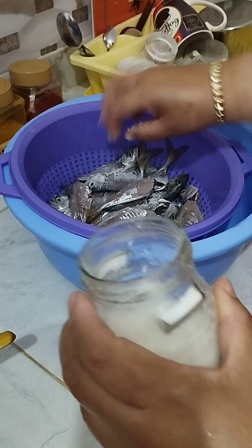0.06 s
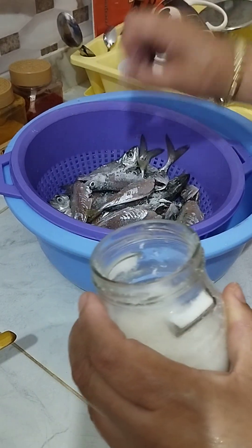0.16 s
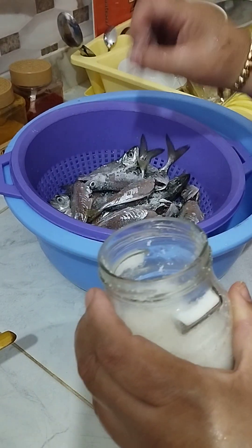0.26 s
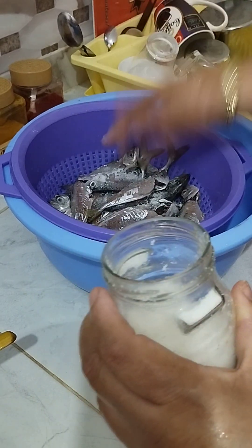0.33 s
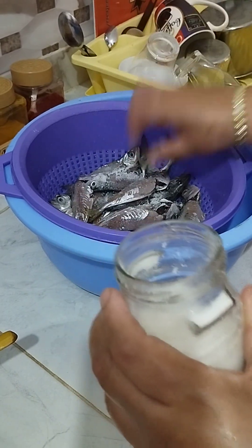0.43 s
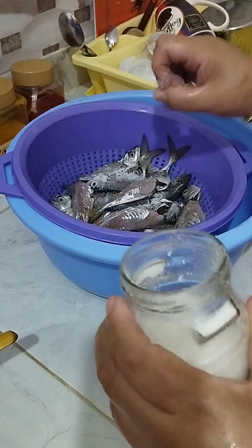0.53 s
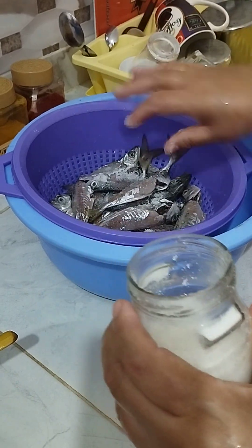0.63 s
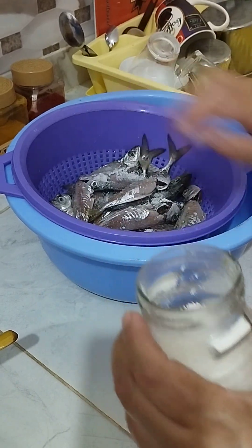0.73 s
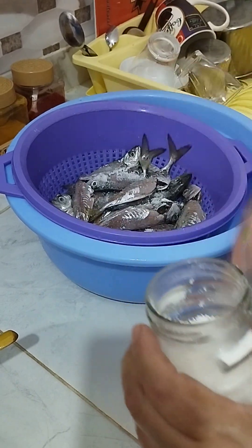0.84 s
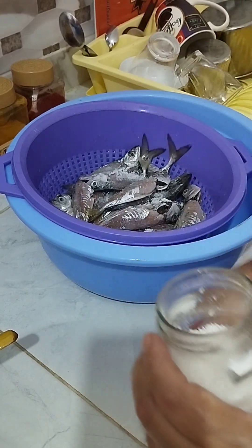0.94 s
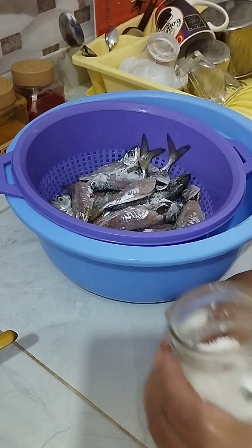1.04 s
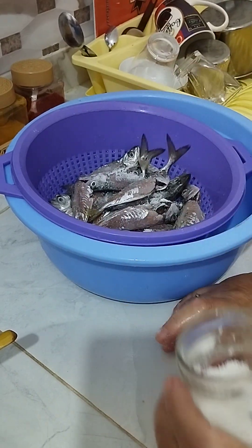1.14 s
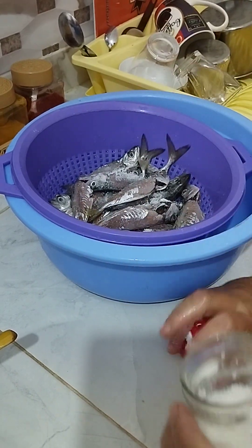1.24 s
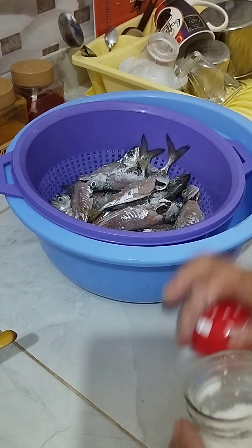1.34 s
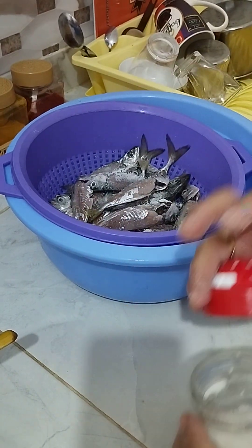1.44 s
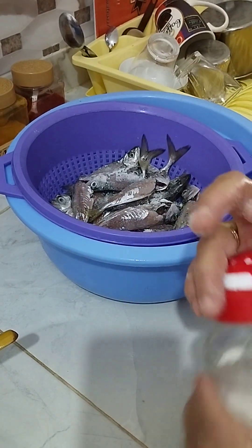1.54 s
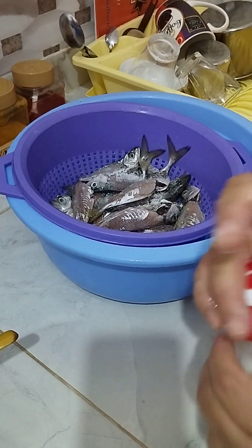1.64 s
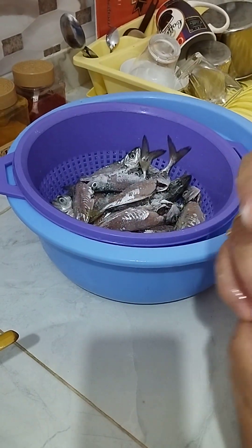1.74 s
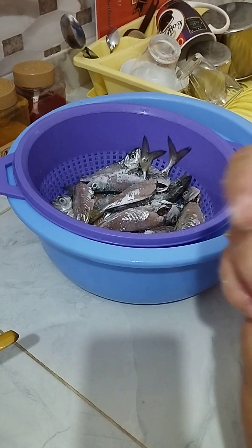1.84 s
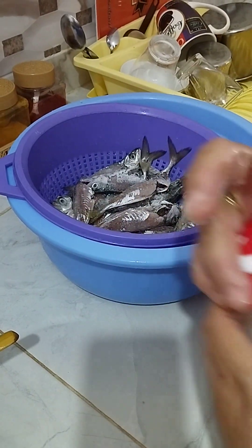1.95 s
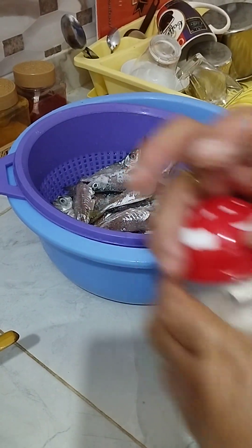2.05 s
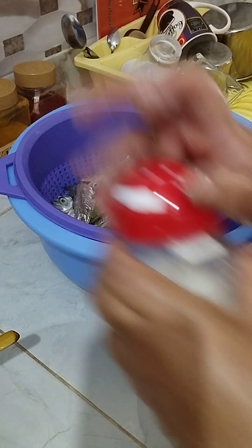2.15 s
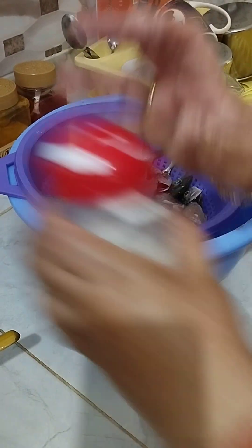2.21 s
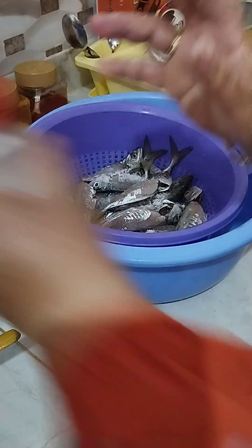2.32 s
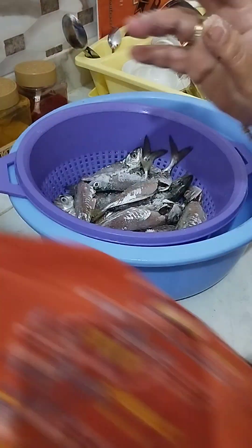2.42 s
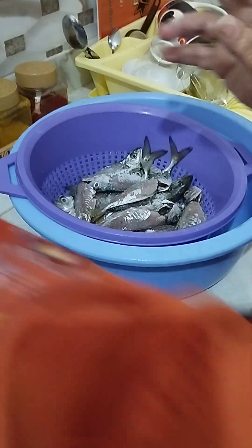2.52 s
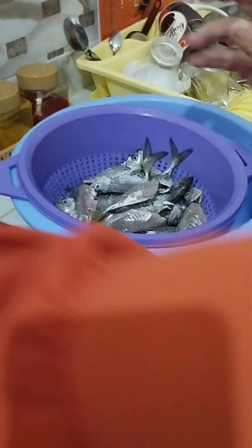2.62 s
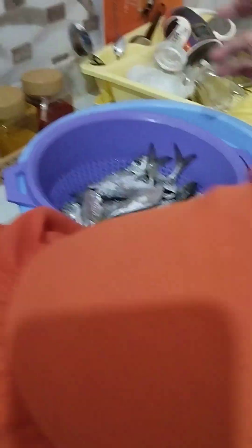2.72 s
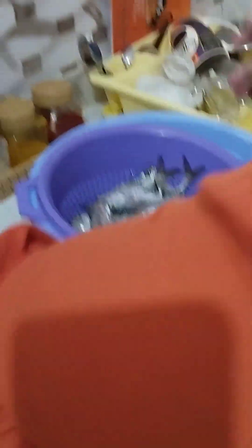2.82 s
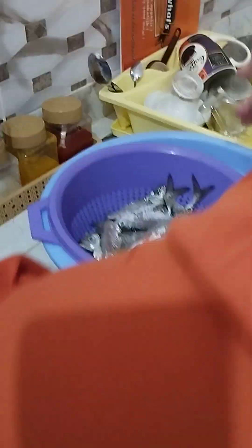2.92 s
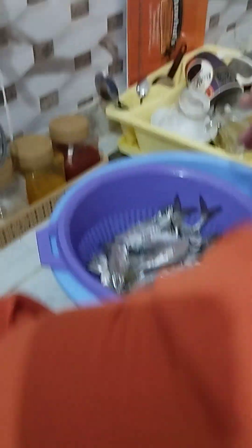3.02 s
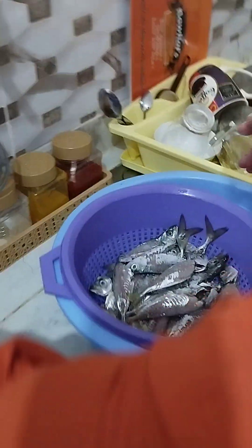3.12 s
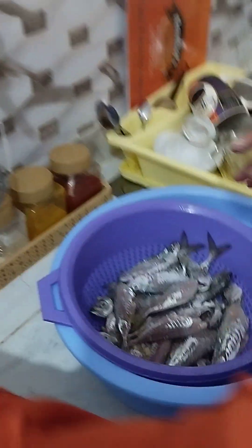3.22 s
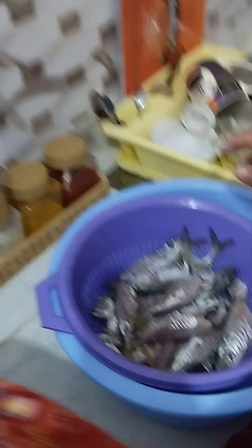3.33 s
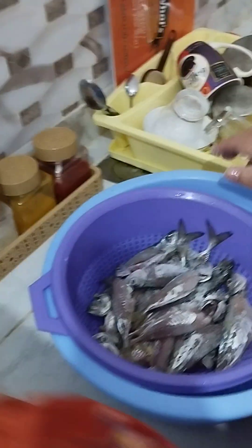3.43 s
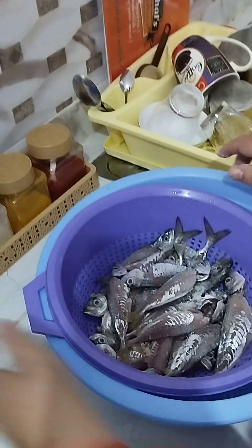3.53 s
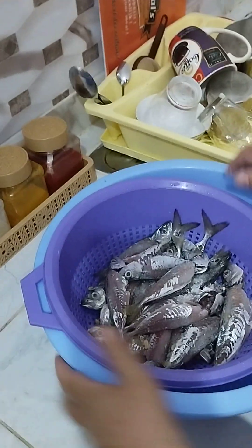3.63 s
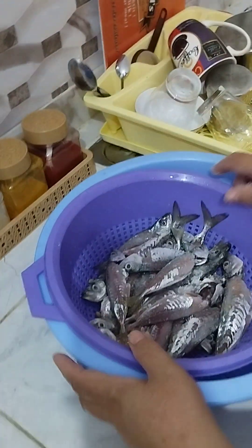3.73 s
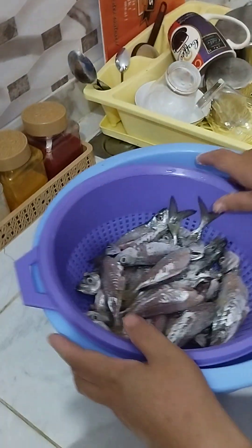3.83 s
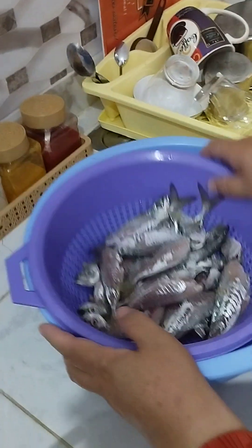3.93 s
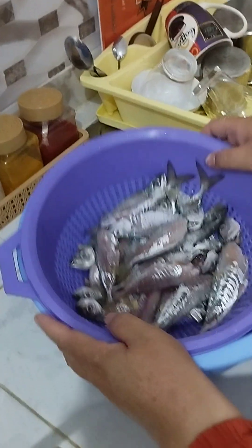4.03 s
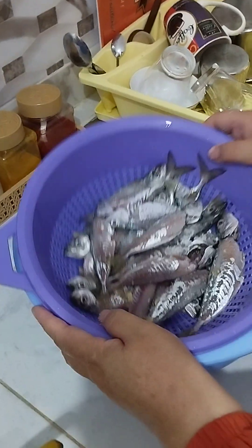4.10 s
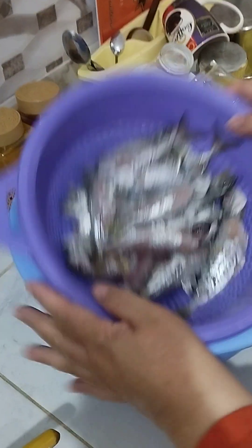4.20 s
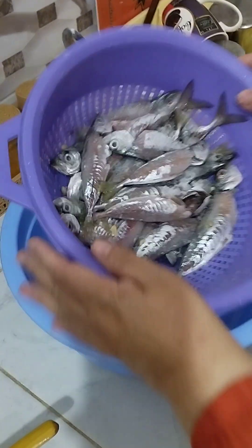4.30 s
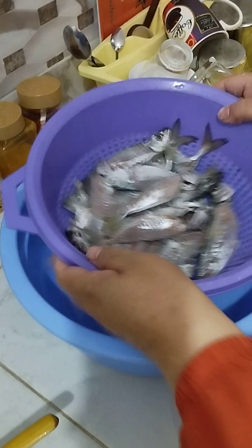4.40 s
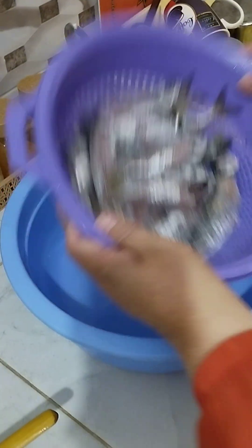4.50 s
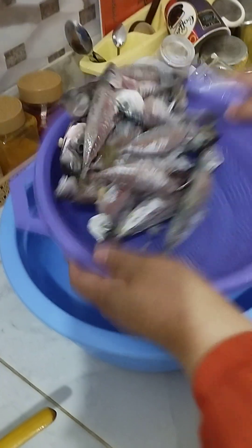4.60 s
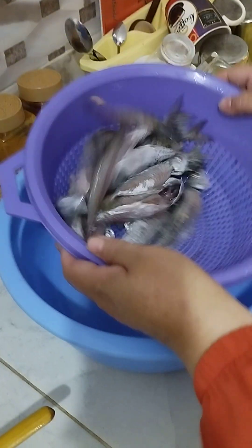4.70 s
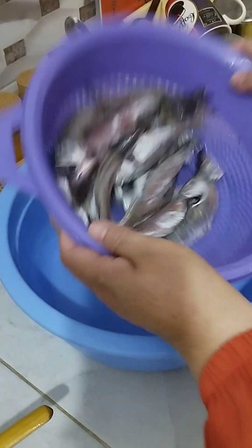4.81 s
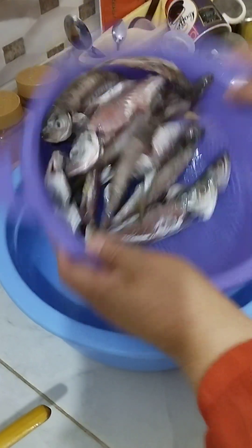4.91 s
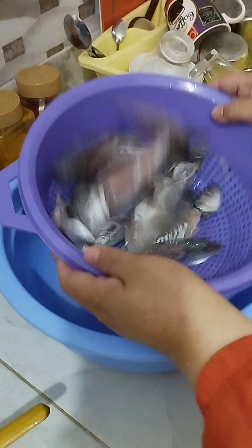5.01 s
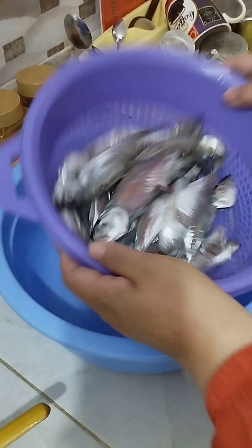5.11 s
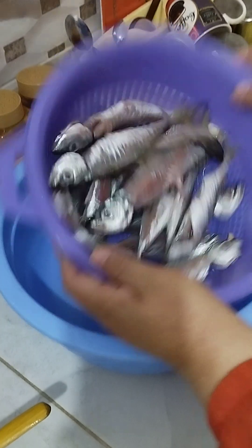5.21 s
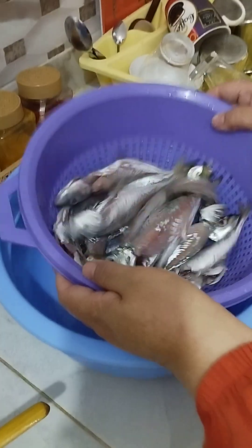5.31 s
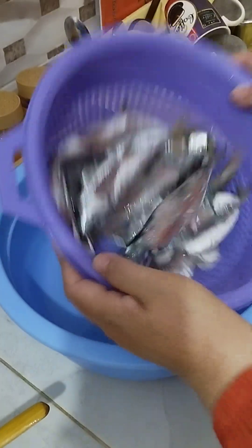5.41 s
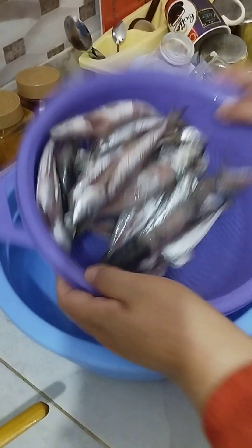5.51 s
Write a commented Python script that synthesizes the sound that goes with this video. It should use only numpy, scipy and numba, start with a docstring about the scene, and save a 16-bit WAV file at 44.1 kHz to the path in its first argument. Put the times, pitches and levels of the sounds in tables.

```python
"""A tiled kitchen where a motor hums under it all, heard through a phone's two microphone ports.
A hand salts fish: grains rustle and sizzle, with dull thuds and ticks. A plastic lid rattles round its
thread and snaps onto a jar, its modes swelling and dying. A basin is pushed about, then a plastic colander
of fish is tossed about three times a second: pushes ring basin modes, slides rustle, noise cracks."""
import sys
import numpy as np
from scipy import signal
from scipy.fft import rfft, irfft
from scipy.io import wavfile
from scipy.ndimage import uniform_filter1d
from numba import njit

SR = 44100
rng = np.random.default_rng(int(sys.argv[2]) if len(sys.argv) > 2 else 0)


def store_wav(level_fs):
    """Save 16-bit WAV to argv[1]."""
    pcm = np.round(np.clip(np.atleast_2d(level_fs), -1, 1) * 32767)
    wavfile.write(sys.argv[1], SR, pcm.T.astype(np.int16))


N = 244907

# Steady air of the kitchen, relative spectrum: (frequency [Hz], level [dB])
AIR_SPECTRUM = [(30, -39), (75, -6.5), (110, -7), (200, -13.5), (320, -14.5), (600, -22.5), (1300, -33.5),
                (2500, -33), (5000, -43), (9000, -30.5), (16000, -37)]
AIR_DB = -49.5  # central rms level
# Motor, hum then whine: (frequency [Hz], hum wander or whine bandwidth [Hz], central rms level [dB])
MOTOR = [(146.2, 2.12, -46.5), (985, 28, -64)]
# Phone in an unsteady hand: (time [s], rms level [dB])
HANDLING_LEVEL = [(0.0, -42.5), (2.6, -42.5), (3.0, -43.5), (3.6, -35), (4.1, -36), (5.55, -43)]
# Relative spectrum of that handling: (frequency [Hz], gain [dB])
HANDLING_SPECTRUM = [(15, 4.5), (30, -4.5), (50, -6.0), (75, -17), (120, -40.5)]
# Decay of the tiled room, never used below 0.1 s: (frequency [Hz], time to fall 60 dB [s])
ROOM_T60 = [(60, 0.67), (250, 0.9), (1000, 0.7), (4000, 0.73), (8000, 0.32), (16000, 0.05)]
# Echo of the tiled walls: (frequency [Hz], echo energy over its send [dB])
ROOM_LEVEL = [(60, 1), (140, -1), (280, -4.5), (600, -0.5), (1200, -2.5), (2500, -2.5), (4000, -7),
              (8000, -3), (16000, -12)]
# Likeness of the two channels of a noise: (frequency [Hz], left-right correlation [-1 to 1])
STEREO_LIKENESS = [(25, 0.06), (80, 1), (160, 1), (350, 0.54), (700, 0.24), (1400, 0.011), (16000, 0.016)]
# Response shared by both microphone ports: (frequency [Hz], gain [dB])
MIC_RESPONSE = [(20, -5), (4500, 1.5), (7000, -3), (8000, -13.5), (10000, -12), (11000, -17), (12000, -4),
                (14000, -4), (16000, -13)]
# Mismatch of the two ports: (frequency [Hz], left minus right [dB])
PORT_MISMATCH = [(60, 2.5), (110, 0.5), (200, -2.5), (380, 1), (700, 0.5), (1290, 0), (2380, -1),
                 (4400, -2.5), (8120, -8), (15000, 8.5)]
TOP_HZ = 16000  # cutoff after the ports

# Lid turning on the jar: (time [s], rms level [dB])
THREAD_LEVEL = [(1.951, -85), (1.959, -35.5), (2.0, -54), (2.07, -48.5), (2.095, -46), (2.17, -47.5),
                (2.191, -38)]
THREAD_HZ = 944
# Modes of the snapping lid: (frequency [Hz], width [Hz], relative height in the spectrum [dB])
LID_MODES = [(610, 320, 6.5), (1425, 690, 7.5), (2215, 320, -2.5), (3380, 520, 3.5), (4110, 630, 7),
             (4750, 430, -2), (5240, 1300, -24), (7500, 6800, -14.5)]
# Colour of the crack as the lid snaps: (frequency [Hz], gain [dB])
LID_CRACK = [(300, -6), (1200, -4), (2600, -4.5), (3000, 0.5),
             (4700, -12.0), (5200, -14), (8000, -12), (16000, -28)]
LID_S, LID_DB, LID_PAN_DB = 2.1945, -2.8, 1.5  # time, ring peak before panning, left minus right

# Slides of hands, fish and plastic; rises and falls shorter than 3 ms, or negative, take 3 ms:
# (peak time [s], rise by 20 dB [s], fall by 20 dB [s], rustle level [dB], rustle centre [Hz],
#  sizzle level before its share [dB], rumble level before its share [dB])
SLIDES = [(0.69, 0.14, 0.35, -52, 2810, -48.5, -43), (0.77, 0.03, 0.3, -55.5, 2900, -55, -40),
          (0.851, -0.13, 0, -48, 3300, -69, -42), (1.02, 0.1, 0.36, -56, 3400, -62, -43.5),
          (1.101, 0.13, 0.09, -47, 2380, -44.5, -50), (1.956, 0.45, 0, -64, 1730, -65, -42),
          (2.03, 0.24, 0.64, -49, 1820, -53.5, -34.5), (2.83, -0.24, 0.5, -49.5, 1350, -55.5, -41),
          (2.969, 0.34, 0.22, -43, 1450, -54, -33.5), (3.04, -0.45, 0.25, -65, 1700, -55, -42),
          (3.231, -0.08, 0.1, -47.5, 2170, -57, -32), (3.36, 0.0139, 0.24, -37, 1690, -46, -23.5),
          (3.511, -0.2, -0.19, -46, 2030, -29, -53), (3.635, 0.3, -0.3, -54.5, 2050, -45, -60),
          (3.723, 0.004, 0.15, -31, 1800, -32.5, -17), (3.8, -0.01, 0.2, -37.5, 1800, -37, -25),
          (3.973, -0.4, 0.35, -44, 3570, -37.5, -49), (4.078, -0.11, 0.12, -34.5, 1860, -40, -25.5),
          (4.354, 0.05, 0.2, -34.5, 2096, -39, -29), (4.414, -0.0854, 0.01, -26, 2070, -38, -23),
          (4.61, 0, 0.65, -48.5, 2300, -44.5, -55), (4.688, -0.28, 0.09, -32.5, 1950, -30, -24.5),
          (4.88, .06, 0.36, -66, 2620, -49, -57), (4.975, .06, 0.12, -34, 2280, -39, -28.5),
          (5.178, .05, 0.13, -44, 1650, -52, -37), (5.289, 0.16, 0.13, -39, 2170, -37, -38),
          (5.46, .05, 1, -55.5, 2700, -50, -58), (5.55, -0.06, -8, -35, 1770, -44, -33)]
# Colour of rustling fish and tick cracks: (frequency [Hz], gain [dB])
RUSTLE_COLOUR = [(500, -3), (850, -2), (1150, -5), (1600, -3), (2500, -4.5), (4000, -4), (6500, -10),
                 (9000, -11), (16000, -20.5)]
# Colour of sizzling wet salt and dry snaps: (frequency [Hz], gain [dB])
SIZZLE_COLOUR = [(3000, -32), (6000, -10), (9000, -1), (12000, -4.5), (16000, 2)]
SIZZLE_SHARE, RUMBLE_SHARE = 2.17, 0.28  # amplitude that leaves the basin
MESH_WIDTH, PATCHY_DB = .25, 1.8  # rustle bandwidth over its centre; spread of rustle level
HOLLOW_HZ = 341  # rumble through the plastic

# Hard ticks of plastic, nails and slapping fish:
# (time [s], peak level before panning [dB], ring frequency [Hz], crack over ring [dB], left minus right [dB])
TICKS = [(0.2236, -43.5, 3220, 1, -10), (0.6863, -28, 3480, -1, 8), (0.7158, -30.5, 3530, 1, -1.5),
         (0.759, -39, 1040, 13, -9), (1.088, -41, 2130, -2, -7), (1.9539, -21.5, 1024, 10, -7.5),
         (2.0179, -36.5, 1070, 16, -16), (2.096, -32, 1050, -14, -9), (2.1083, -30.5, 1060, 2, -12),
         (2.8264, -24, 1270, 8, 0), (2.871, -32.5, 1270, -4, 2), (2.893, -24.5, 1800, 1, -6),
         (2.929, -31, 1800, -2, -4), (2.9528, -24.5, 1660, -20, -4), (2.9675, -24.5, 1265, 0, 6),
         (2.9986, -31.5, 2170, -13, -11), (3.2094, -34.5, 1710, 6.5, -6), (3.3552, -13, 1620, 2.5, -11.5),
         (3.457, -26.5, 1330, 6, -3.0), (3.6584, -24, 2256, -6, 0), (3.689, -23.5, 1740, 14, -2),
         (3.7217, -15, 2310, -2, 8), (3.7729, -14.5, 1800, 6, -7), (4.0347, -23, 1910, 7, -8),
         (4.0491, -21, 2190, 6, 18.5), (4.0757, -23, 1720, -6, -10), (4.337, -31, 2000, -2, 2),
         (4.353, -30, 2300, 3, 13), (4.3879, -17.5, 2220, 6, 1), (4.4173, -23, 2250, 25, -3.0),
         (4.5967, -35, 6200, -4, -9), (4.6119, -26, 2350, -1, 0), (4.6506, -21.5, 2310, 9, 3),
         (4.6744, -26, 1580, 2.5, -22), (4.7055, -22, 2290, 24, -17), (4.935, -28.5, 2200, 5.5, -5),
         (4.9666, -24, 2380, 8, -15), (5.1577, -26.5, 1410, -3, -10), (5.242, -26.5, 1920, 3, -13),
         (5.2615, -25, 1810, 6, 10), (5.2892, -22, 2370, 11, -4), (5.3431, -28, 2000, 11, -11),
         (5.53, -35, 1790, 4, -9)]
# Dry treble snaps of salt and scales: (time [s], peak level before panning [dB], left minus right [dB])
SNAPS = [(0.6594, -30, -3), (0.7592, -26, 19), (1.08, -36, 12), (2.018, -26, 1), (2.1939, -29, -2),
         (2.412, -32.5, -12), (2.8928, -24.5, 7), (3.438, -24.5, 5), (3.632, -24, 3), (3.7234, -37, 23),
         (3.803, -9.5, -1), (3.9649, -12, -1), (4.0746, -23.5, 27), (4.362, -33, 17), (4.4176, -8.5, 4),
         (4.448, -16, -1), (4.599, -36, -7), (4.7047, -12, -7), (4.963, -21, 20), (5.2884, -12.5, 8)]
TICK_CYCLES = 26.3  # cycles until the main ring has died by 60 dB

# Dull blows of basin, colander, jar and landing fish:
# (time [s], peak level [dB], freedom to ring [share of full decay], boom over wall [dB],
#  wall mode best struck [Hz], loss away from it [dB per octave, sign ignored])
THUDS = [(0.684, -31, 0.36, -20, 445, 14.5), (0.719, -34.5, 0.64, -16, 375, 20),
         (0.77, -38, 0.6, -16, 330, 21.5), (0.98, -36, 0.4, -13, 358, 16.5),
         (1.079, -39.5, 0.9, -21, 357, 24), (1.506, -39.5, 0.75, -23, 510, 40),
         (1.955, -28.5, 0.6, 5, 330, 9), (1.997, -26, 0.66, -13.5, 282, 22), (2.086, -24.5, 1, 3.5, 298, 9),
         (2.211, -15, 0.25, -19.5, 550, 9), (2.244, -15, 0.54, -16, 544, 17),
         (2.279, -17.5, 1, -12, 520, 9), (2.888, -26, 0.77, -11.5, 480, 11), (2.969, -27, 0.9, -13, 595, 4),
         (3.352, -9, 0.67, -9, 403, 1.5), (3.686, -21, 0.86, -18, 416, 16.5),
         (3.773, -12, 0.83, -4, 765, 3.5), (3.799, -14.5, 0.98, 8.5, 191, 5),
         (4.081, -18.5, 0.82, -1, 305, 1.5), (4.12, -22, 0.48, -6, 193, 1.5),
         (4.387, -19, 0.9, -11.5, 770, 11), (4.405, -18, 0.5, -4, 179, 11), (4.68, -17, 0.53, -6, 385, 6),
         (4.719, -24, 0.6, -6, 454, 28), (4.984, -19, 1, 3.5, 189, 0), (5.04, -23, 0.4, 7, 400, -4),
         (5.153, -19.5, 0.8, -9, 440, 7), (5.175, -29.5, 0.67, -16, 450, 30),
         (5.215, -24.5, 0.37, -4, 450, 12), (5.283, -20.5, 0.3, 3, 232, 3),
         (5.31, -22.5, 0.26, 1.5, 267, 12), (5.349, -27.5, 0.32, 17, 190, 14), (5.518, -33, 0.7, 5, 290, 3)]
# Modes of the basin: (frequency before detuning [Hz], relative level [dB], full time to fall 60 dB [s])
BASIN_MODES = [(102, -10, 0.29), (124.4, 9, 0.42), (178.7, 4.5, 0.27), (234.1, 0.5, 0.33),
               (304.3, -1.5, 0.29), (380.7, -3, 0.22), (449.6, -6, 0.36), (511.5, -7.5, 0.23),
               (648.3, -4, 0.11), (769, 1, 0.071), (864, -1, 0.12), (957, -4, 0.059)]
CONTACT_MS, BOOM_HZ = 0.91, 150  # length of the push; modes below this are the boom
SWELL_CYCLES = 0.48  # time constant of a mode's swell, in its own cycles


def undb(db):
    """Amplitude for a level in dB."""
    return 10 ** (np.asarray(db) / 20)


def unit(x):
    """Scale to an rms of 1."""
    return x / np.sqrt(np.mean(x ** 2))


def curve(table, hz):
    """Read (Hz, value) points on a log-frequency axis."""
    f, v = np.transpose(table)
    return np.interp(np.log(np.maximum(hz, 1)), np.log(f), v)


def colour(x, table):
    """Causal minimum-phase filter with the gain of (Hz, dB) points, from the folded cepstrum."""
    cepstrum = irfft(np.log(undb(curve(table, np.fft.rfftfreq(4096, 1 / SR)))))
    cepstrum[1:2048] *= 2
    cepstrum[2049:] = 0
    impulse = irfft(np.exp(rfft(cepstrum)))
    return signal.fftconvolve(x, impulse)[:len(x)]


@njit
def svf(x, hz, share):
    """State-variable band-pass whose centre may move; width is a share of the centre."""
    y, band, low = np.empty(len(x)), 0., 0.
    for i in range(len(x)):
        g = np.tan(np.pi * hz[i] / SR)
        v = (band + g * (x[i] - low)) / (1 + g * (g + share))
        band, low, y[i] = 2 * v - band, low + 2 * g * v, share * v
    return y


def pair(size):
    """Two noises, correlated frequency by frequency through a mid and side mix."""
    likeness = np.clip(curve(STEREO_LIKENESS, np.fft.rfftfreq(size, 1 / SR)), 0, 1)
    mid, side = rfft(rng.standard_normal((2, size)))
    mid = mid * np.sqrt((1 + likeness) / 2)
    side = side * np.sqrt((1 - likeness) / 2)
    return irfft(mid + np.array([[1], [-1]]) * side, size)


def ring(t, hz, t60, phase=0):
    """A sine that falls 60 dB in t60 seconds."""
    return np.sin(2 * np.pi * hz * t + phase) * np.exp(-np.log(1000) * t / t60)


def add(out, s, sound, db, pan_db=0):
    """Place a sound at s seconds with its peak at db, then pan it."""
    i = int(s * SR)
    sound = sound[:N - i]
    sound = sound * undb(db) / np.abs(sound).max()
    out[:, i:i + len(sound)] += sound * undb(np.array([[pan_db], [-pan_db]]) / 2)


def walk(rate):
    """Random levels held 1 / rate s and slewed twice; spread 1."""
    hold = int(SR / rate)
    steps = np.repeat(rng.standard_normal(N // hold + 1), hold)
    return unit(uniform_filter1d(uniform_filter1d(steps, hold), hold)[:N])


def grains(rate, spread_db, bed):
    """Random clicks, a few much larger than the rest, over a bed of hiss."""
    hit = rng.random(N) < rate / SR
    size = undb(spread_db * np.minimum(rng.exponential(size=N), 4.5))
    clicks = unit(hit * size * rng.standard_normal(N))
    return unit(clicks + bed * rng.standard_normal(N))


def kitchen_air():
    """Steady coloured noise of the air, flickering slightly in level."""
    air = unit(np.array([colour(c, AIR_SPECTRUM) for c in pair(N)]))
    return air * undb(AIR_DB + 1.6 * walk(9))


def motor():
    """A sine hum that wavers in pitch and level, with a narrow band of noise as its whine."""
    t = np.arange(N) / SR
    (hz, width, db), (whine_hz, whine_width, whine_db) = MOTOR
    wander = np.cumsum(width / 2 * walk(2.8)) / SR
    hum = np.sqrt(2) * undb(db + 1.0 * walk(15)) * np.sin(2 * np.pi * (hz * t + wander))
    whine = signal.lfilter(*signal.iirpeak(whine_hz, whine_hz / whine_width, SR), pair(N))
    return hum + unit(whine) * undb(whine_db)


def handling():
    """Deep noise from the hand that holds the phone, partly one-sided in the lowest bass."""
    s, db = np.transpose(HANDLING_LEVEL)
    deep = np.array([colour(c, HANDLING_SPECTRUM) for c in pair(N)])
    return unit(deep) * undb(np.interp(np.arange(N) / SR, s, db))


def room():
    """Stereo echo of the tiled walls: noise that builds up in a few ms and dies away band by band."""
    t, tail = np.arange(int(1.2 * SR)) / SR, 0
    hz = np.fft.rfftfreq(len(t), 1 / SR)
    noise = rfft(pair(len(t)))
    build = 1 - np.exp(-(t / 0.0048) ** 2)
    for centre in 45 * 2 ** np.arange(0, 9, .5):
        # half-octave triangles that overlap to a flat sum
        weight = np.clip(1 - 2 * np.abs(np.log2(np.maximum(hz, 1) / centre)), 0, 1)
        band = irfft(noise * weight, len(t))
        fade = np.exp(-np.log(1000) * t / max(curve(ROOM_T60, centre), .1)) * build
        tail = tail + band * fade / np.sqrt(np.sum(fade ** 2)) * undb(curve(ROOM_LEVEL, centre))
    return tail


def lid_thread():
    """The lid rattles round its thread: grains through a band-pass."""
    s, db = np.transpose(THREAD_LEVEL)
    rattle = unit(svf(grains(400, 5.8, 0.63), np.full(N, 1. * THREAD_HZ), 0.13))
    return rattle * undb(np.interp(np.arange(N) / SR, s, db, -150, -150))  # off outside the table


def lid_snap():
    """The slip over the rim pumps modes up for at most a ms, then the hand mutes them; a crack on top."""
    crack_side, other_side = np.zeros((2, N)), np.zeros((2, N))
    t = np.arange(SR // 20) / SR
    phases = 2 * np.pi * rng.random(len(LID_MODES))
    # t times a decay swells and dies; width squared makes db the height in the spectrum
    modes = np.array([undb(db) * width ** 2 * t * ring(t, hz, np.log(1000) / np.pi / width, phase)
                      for (hz, width, db), phase in zip(LID_MODES, phases)])
    whole_peak = np.abs(modes.sum(axis=0)).max()
    # alternate modes are kept apart for the echo
    for k, out in enumerate((crack_side, other_side)):
        half = modes[k::2].sum(axis=0)
        half_db = 20 * np.log10(np.abs(half).max() / whole_peak)
        add(out, LID_S, half, LID_DB + half_db, LID_PAN_DB)
    crack = colour(rng.standard_normal(len(t)) * np.exp(-t / 0.0058), LID_CRACK)
    add(crack_side, LID_S, crack, -14.0, LID_PAN_DB)
    return crack_side, other_side


def slides():
    """Stick-slip grains: rustle of fish on mesh, sizzle of wet salt, a hollow rumble through the plastic."""
    s, rise, fall, rustle_db, centre_hz, sizzle_db, rumble_db = np.transpose(SLIDES)[:, :, None]
    sample_s, time = np.arange(N) / SR, np.arange(0, N + 64, 64) / SR  # levels on a coarse grid
    before, after = (s - time) / np.maximum(rise, .003), (time - s) / np.maximum(fall, .003)
    swell_db = -20 * np.where(time < s, before, after)

    def level(db):
        """Overlapping slides add in power."""
        return np.interp(sample_s, time, np.sqrt(np.sum(undb(db + swell_db) ** 2, axis=0)))

    def wide(x, share):
        """Grains lie all over the basin, so each port also hears its own."""
        return unit(x[0] + share * x[1:])

    centre_hz = np.interp(sample_s, s[:, 0], centre_hz[:, 0])
    hollow_hz = np.full(N, 1. * HOLLOW_HZ)
    rustle = [colour(grains(900, 2.41, 1.0), RUSTLE_COLOUR) for _ in range(3)]
    rustle = np.array([x + 0.86 * svf(x, centre_hz, MESH_WIDTH) for x in rustle])
    rustle = wide(rustle, 2.04) * undb(PATCHY_DB * walk(70))
    sizzle = np.array([colour(grains(3000, 0.34, 0.53), SIZZLE_COLOUR) for _ in range(3)])
    sizzle = wide(sizzle, 6.6) * undb(3.4 * walk(63))
    rumble = unit(svf(svf(grains(400, 7.3, 0.63), hollow_hz, 0.47), hollow_hz, 0.47))
    out = rustle * level(rustle_db)
    out = out + SIZZLE_SHARE * sizzle * level(sizzle_db)
    return out + RUMBLE_SHARE * rumble * level(rumble_db)


def snaps():
    """Salt and scales snap dry: bursts of treble noise that die in a few ms."""
    out, t = np.zeros((2, N)), np.arange(SR // 10) / SR
    for s, db, pan_db in SNAPS:
        burst = rng.standard_normal(len(t)) * np.exp(-t / 0.0028)
        add(out, s, colour(burst, SIZZLE_COLOUR), db, pan_db)
    return out


def ticks():
    """A hard touch gives a crack of noise over a short plastic ring of two modes."""
    out, t = np.zeros((2, N)), np.arange(SR // 10) / SR
    for s, db, hz, crack_db, pan_db in TICKS:
        crack = colour(rng.standard_normal(len(t)) * np.exp(-t / 0.0045), RUSTLE_COLOUR)
        t60 = TICK_CYCLES / hz
        plastic = ring(t, hz, t60) + 0.71 * ring(t, hz * 1.44, t60 / 2)
        add(out, s, undb(crack_db) * crack + plastic, db, pan_db)
    return out


def thuds():
    """A half-sine push rings the basin; where it lands decides which modes sound, and they swell in."""
    out, t = np.zeros((2, N)), np.arange(SR) / SR
    hz, db, t60 = np.transpose(BASIN_MODES)[:, :, None]
    push = np.sin(np.pi * np.clip(t[:SR // 20] * 1000 / CONTACT_MS, 0, 1))
    swell = 1 - np.exp(-t * hz / SWELL_CYCLES)
    for s, peak_db, free, boom_db, spot_hz, off_db in THUDS:
        share, detune, phase = rng.standard_normal((3, len(hz), 1))
        wall_db = -np.abs(off_db) * np.abs(np.log2(hz / spot_hz))
        spot_db = np.where(hz < BOOM_HZ, boom_db, wall_db)
        size = undb(db + spot_db + 2.1 * share) * swell
        modes = ring(t, hz * (1 + 0.0054 * detune), np.clip(t60 * free, .03, 1.5), np.pi * phase)
        body = np.sum(size * modes, axis=0)
        add(out, s, signal.fftconvolve(body, push)[:SR], peak_db)
    return out


def scene():
    """Basin and jar, with their echo off the walls, over the air, motor and handling."""
    basin = thuds() + ticks() + snaps() + slides()
    jar, jar_other = lid_snap()
    jar = jar + lid_thread()
    # neighbouring modes of the lid beam different ways, so they reach the walls by different paths
    sends = [basin + undb(3.5) * jar, undb(3.5) * jar_other]
    echo = sum(signal.fftconvolve(np.mean(x, axis=0, keepdims=True), room())[:, :N] for x in sends)
    jar = jar + jar_other
    # the basin is nearer the left port, the jar nearer the right: delays in samples
    basin[1] = np.roll(basin[1], shift=6)
    jar[0] = np.roll(jar[0], shift=3)
    return basin + jar + echo + kitchen_air() + motor() + handling()


def record(dry):
    """Each port colours the sound, with a dip near 10 kHz and less loss just above; then the top is cut."""
    ports = []
    for x, sign in zip(dry, (1, -1)):
        mismatch = [(hz, sign * db / 2) for hz, db in PORT_MISMATCH]
        ports.append(colour(colour(x, MIC_RESPONSE), mismatch))
    top_cut = signal.ellip(10, .2, 80, TOP_HZ, fs=SR, output="sos")
    return signal.sosfilt(top_cut, np.array(ports))


dry = scene()
out = record(dry)
store_wav(out)
```